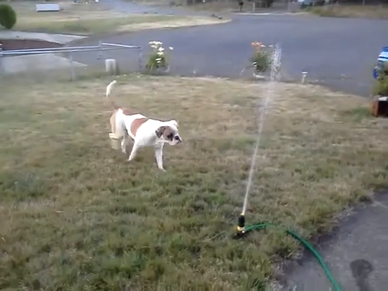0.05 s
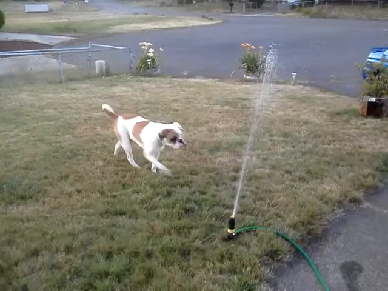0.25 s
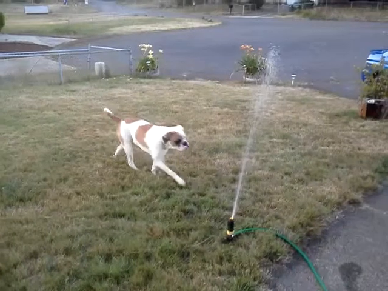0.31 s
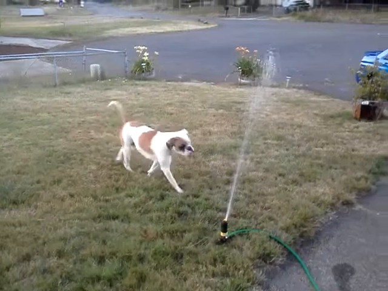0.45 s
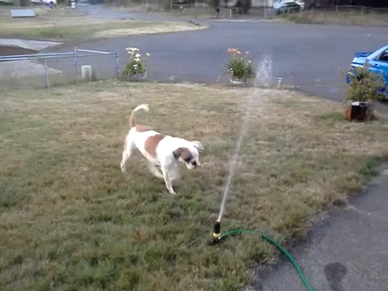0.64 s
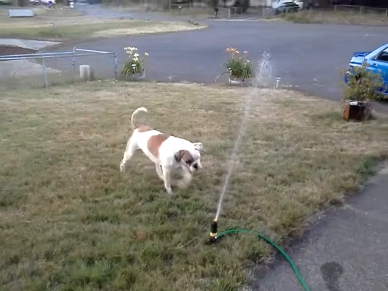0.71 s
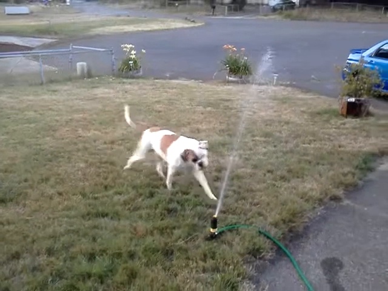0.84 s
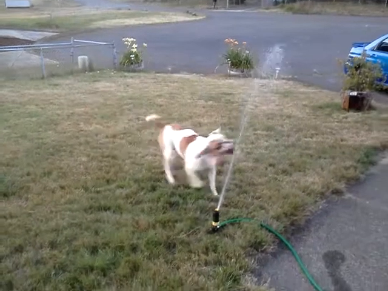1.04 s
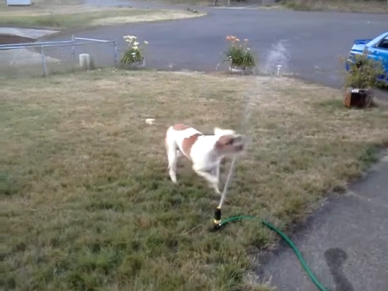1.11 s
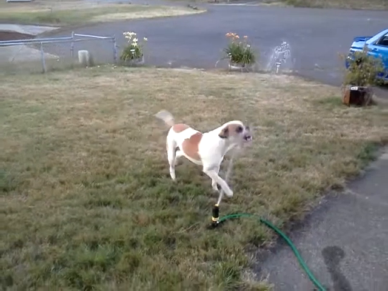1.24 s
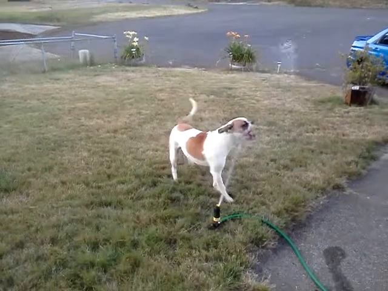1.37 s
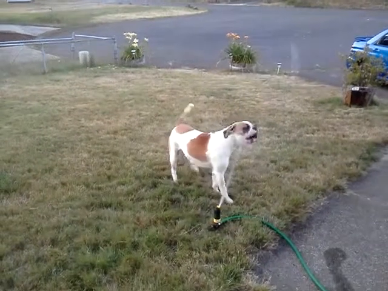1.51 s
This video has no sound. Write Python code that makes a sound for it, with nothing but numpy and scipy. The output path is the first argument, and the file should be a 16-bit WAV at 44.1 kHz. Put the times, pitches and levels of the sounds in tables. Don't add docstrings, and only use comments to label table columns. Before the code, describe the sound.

A lawn sprinkler jet sputters in a harsh, crackling burst of spray, then calms to thin hiss

```python
import sys
import numpy as np
from scipy import signal
from scipy.fft import rfft, irfft
from scipy.io import wavfile
from scipy.ndimage import uniform_filter1d

SR = 44100
rng = np.random.default_rng(int(sys.argv[2]) if len(sys.argv) > 2 else 0)


def store_pcm(level_fs):
    pcm = np.round(np.clip(level_fs, -1, 1) * 32767).astype(np.int16)
    wavfile.write(sys.argv[1], SR, np.atleast_2d(pcm).T)


def linear_from_db(decibels):
    return 10 ** (np.asarray(decibels, float) / 20)


N = 68355

# frequency in Hz, level in dB per Hz.
PORT_COLOUR = [(1300, -67.5), (2300, -26.5), (3600, -18.5), (4300, -11), (5040, -4.5), (6000, -8),
               (7300, -14.5), (8600, -10.5)]


def level(x, db):
    return x * linear_from_db(db) / np.sqrt(np.mean(x ** 2))


def colour(x, table):
    size = 8192
    hz, db = np.array(table).T
    bin_hz = np.arange(size // 2 + 1) * SR / size
    gain_db = np.interp(np.log(bin_hz + 1), np.log(hz), db)
    cepstrum = irfft(np.log(linear_from_db(gain_db)))
    cepstrum[1:size // 2] *= 2
    cepstrum[size // 2 + 1:] = 0
    impulse = irfft(np.exp(rfft(cepstrum)))
    return signal.fftconvolve(x, impulse)[:len(x)]


def band(hz, width_hz):
    b, a = signal.iirpeak(hz, hz / width_hz, fs=SR)
    once = signal.lfilter(b, a, rng.standard_normal(N))
    return signal.lfilter(b, a, once)


def walk(rate):
    hold = int(SR / rate)
    steps = np.repeat(rng.standard_normal(N // hold + 1), hold)
    slewed = uniform_filter1d(uniform_filter1d(steps, hold), hold)
    return 1.3 * slewed[:N]


def cracks(start_s, gain, hz, width_hz, rise_s=1e-6):
    at = np.floor(start_s * SR).astype(int)[:, None] + np.arange(1, 65)
    t = at / SR - start_s[:, None]
    envelope = (1 - np.exp(-t / rise_s)) * np.exp(-np.pi * width_hz * t)
    wave = gain[:, None] * envelope * np.sin(2 * np.pi * hz[:, None] * t)
    return np.bincount(at.ravel(), wave.ravel(), N + 99)[:N]


def slugs():
    # time of the peak in seconds, peak behind the port in dB, pitch in Hz.
    early_slugs = [(0.2577, -17, 5070), (0.2717, -14, 5720), (0.2958, -18, 5490), (0.3064, -14, 5180),
                   (0.3143, -18, 5560), (0.3417, -15, 5400), (0.3658, -16, 5570), (0.3686, -13, 5380),
                   (0.3865, -16, 5440), (0.4074, -6, 4980), (0.427, -13, 5360), (0.4288, -15, 5230),
                   (0.4341, -17, 5160), (0.4468, -9, 5160), (0.4567, -16, 5320), (0.4714, -16, 5260),
                   (0.5165, -8, 5400), (0.5203, -13, 5330), (0.5216, -11, 5300), (0.5262, -9, 5180),
                   (0.529, -16, 5250), (0.5348, -15, 5370), (0.5519, -10, 5650), (0.5576, -10, 5290),
                   (0.5598, -9, 5410), (0.5651, -13, 5370), (0.5695, -5, 4910), (0.576, -14, 4880),
                   (0.5775, -12, 4900), (0.5874, -13, 5070)]
    middle_slugs = [(0.5924, -4, 4910), (0.5985, -10, 5150), (0.6003, -14, 4870), (0.6145, -8, 4820),
                    (0.6168, -12, 5010), (0.6334, -12, 5410), (0.6416, -11, 5430), (0.6452, -12, 4860),
                    (0.6468, -15, 4910), (0.6498, -15, 5040), (0.6537, -9, 5190), (0.655, -12, 5100),
                    (0.678, -5, 5530), (0.6834, -9, 5200), (0.6901, -10, 5210), (0.6978, -14, 5360),
                    (0.7086, -15, 5460), (0.7137, -15, 5280), (0.7155, -16, 5410), (0.7508, -16, 5240),
                    (0.7525, -11, 6060), (0.7539, -15, 5280), (0.7556, -16, 5540), (0.798, -16, 5820),
                    (0.8403, -15, 5110), (0.8478, -13, 5440), (0.8566, -13, 4990), (0.8586, -14, 5130),
                    (0.861, -14, 5320), (0.8629, -15, 5350)]
    late_slugs = [(0.8778, -15, 5300), (0.88, -15, 5220), (0.8978, -15, 5070), (0.8994, -11, 5310),
                  (0.9061, -14, 4970), (0.908, -14, 4820), (0.9283, -11, 5330), (0.93, -13, 5510),
                  (0.9494, -14, 5450), (0.9551, -11, 5160), (0.9625, -7, 4560), (0.9644, -8, 4560),
                  (0.9867, -13, 5160), (0.9911, -14, 5500), (0.9942, -14, 5060), (0.9998, -13, 5510),
                  (1.0076, -6, 4860), (1.0469, -14, 5150), (1.0485, -16, 5100), (1.0514, -14, 4990),
                  (1.0578, -12, 5300), (1.0672, -2, 5060), (1.0781, -12, 5120), (1.1272, -17, 5110),
                  (1.1626, -17, 5640), (1.1788, -16, 5220), (1.2142, -17, 5350), (1.2162, -16, 5260),
                  (1.2692, -17, 5950), (1.4667, -21, 5260)]
    rows = np.concatenate([early_slugs, middle_slugs, late_slugs])
    lag_s, trim_db = -.00022, .4
    pitch_spread = 1.3
    ring_width_hz, ring_rise_s = 1150, .0002
    tick_db, tick_db_per_off, tick_hz, tick_width_hz = 0, 55, 7700, 3500
    middle_hz = np.median(rows[:, 2])
    zero, one = np.zeros(1), np.ones(1)
    out = np.zeros(N)
    for peak_s, peak_db, hz in rows:
        off = hz / middle_hz - 1
        ring_hz = middle_hz * (1 + pitch_spread * off)
        ring = cracks(zero, one, one * ring_hz, ring_width_hz, ring_rise_s)
        tick_gain = linear_from_db(one * (tick_db + tick_db_per_off * off))
        tick = cracks(zero, tick_gain, one * tick_hz, tick_width_hz)
        wave = colour((ring + tick)[:512], PORT_COLOUR)
        swell = np.abs(signal.hilbert(wave))
        at = int((peak_s + lag_s) * SR) - swell.argmax()
        out[at:at + len(wave)] += wave * linear_from_db(peak_db + trim_db) / swell.max()
    return out


def drops():
    # time in seconds, level of the sputter in dB.
    jet_force = [(0, -61), (.18, -74), (0.238, -37.5), (0.298, -33), (.4, -29.5), (.51, -33), (.57, -28),
                 (0.678, -25.5), (0.802, -28), (.96, -25.5), (1.081, -30.5), (1.12, -30), (1.26, -34.5),
                 (1.31, -47.5), (1.55, -65)]
    drops_per_s, spread_db, width_hz, drops_db = 1600, 3, 3900, -1
    bursts_per_s, burst_db = 70, 1.5
    start_s = np.cumsum(rng.exponential(1 / drops_per_s, 8000))
    start_s = start_s[start_s < N / SR]
    count = len(start_s)
    size_db = np.minimum(rng.exponential(spread_db, count), 8)
    size_db = size_db + burst_db * walk(bursts_per_s)[(start_s * SR).astype(int) % N]
    hz = 2800 * 2 ** (1.66 * rng.random(count))
    patter = colour(cracks(start_s, linear_from_db(size_db), hz, width_hz), PORT_COLOUR)
    force_db = np.interp(np.arange(N) / SR, *np.array(jet_force).T)
    return level(patter, drops_db) * linear_from_db(force_db)


def ground(x):
    # delay in seconds, level in dB.
    echoes = [
        (.0018, -8),
        (.0052, -19),
    ]
    out = x.copy()
    for delay_s, db in echoes:
        out += linear_from_db(db) * np.pad(x, (int(delay_s * SR), 0))[:N]
    return out


def hiss():
    # frequency in Hz, level in dB per Hz.
    hiss_colour = [(1400, -25), (2000, -14), (3000, -16), (4200, -7.5), (5100, 1), (6300, -16), (7600, -12),
                   (8700, -9.5)]
    rustle_top_s, rustle_top_len_s, rustle_top_hz, rustle_top_width_hz, rustle_top_db = 0.221, 0.021, 5000, 1000, -29.5
    t = np.arange(N) / SR
    rustle_top = level(band(rustle_top_hz, rustle_top_width_hz), rustle_top_db)
    rustle_top *= np.exp(-((t - rustle_top_s) / rustle_top_len_s) ** 2)
    flicker = linear_from_db(walk(60))
    spray = colour(rng.standard_normal(N) * flicker, hiss_colour)
    return level(spray, -37) + rustle_top


def suburb():
    # frequency in Hz, level in dB per Hz.
    rumble_colour = [(20, -10.5), (40, 1.5), (122, 0), (172, -9.5), (265, -5), (380, -9), (650, -5.5),
                     (1400, -11), (2200, -22.5)]
    whine_hz, whine_width_hz, whine_db = 1322, 65, -49
    hum_hz, hum_width_hz, hum_db = 259, 29, -61
    rustle_s, rustle_len_s, rustle_hz, rustle_width_hz, rustle_db = .225, .022, 3000, 1300, -41.5
    t = np.arange(N) / SR
    rumble = level(colour(rng.standard_normal(N), rumble_colour), -42.5)
    whine = level(band(whine_hz, whine_width_hz) * linear_from_db(0.5 * walk(3.1)), whine_db)
    hum = level(band(hum_hz, hum_width_hz), hum_db)
    rustle = level(band(rustle_hz, rustle_width_hz), rustle_db)
    rustle *= np.exp(-((t - rustle_s) / rustle_len_s) ** 2)
    return rumble + whine + hum + rustle


def scene():
    sputter = ground(slugs() + drops())
    return (sputter + hiss() + suburb())[None]


def thin(x):
    band_hz, low_hz, high_hz = 130, 1560, 1950
    mask_db, memory_frames, late_frames = -37.3, 11, 8
    hz, _, z = signal.stft(x, SR, nperseg=1024, noverlap=768)
    power = uniform_filter1d(np.abs(z[0]) ** 2, memory_frames, axis=1)
    group = (hz // band_hz).astype(int)
    first_bins = np.flatnonzero(np.diff(group, prepend=-1))
    band_power = np.add.reduceat(power, first_bins, axis=0)
    earlier_power = np.roll(power.sum(0), late_frames)
    weak = band_power[group] < earlier_power * linear_from_db(2 * mask_db)
    middle = (hz > low_hz) & (hz < high_hz)
    z[0][weak & middle[:, None]] = 0
    return signal.istft(z, SR, nperseg=1024, noverlap=768)[1][:, :N]


def roll_off(x):
    return signal.sosfilt(signal.butter(12, 8840, fs=SR, output="sos"), x)


def record(dry):
    top_hz, ceiling = 9750, .72
    top_cut = signal.cheby2(10, 70, top_hz, fs=SR, output="sos")
    mix = thin(signal.sosfilt(top_cut, dry))
    return roll_off(np.clip(mix, -ceiling, ceiling))


dry = scene()
out = record(dry)
store_pcm(out)
```